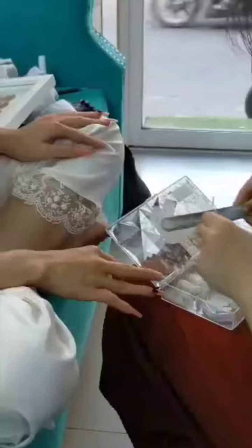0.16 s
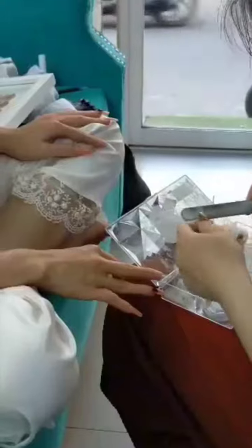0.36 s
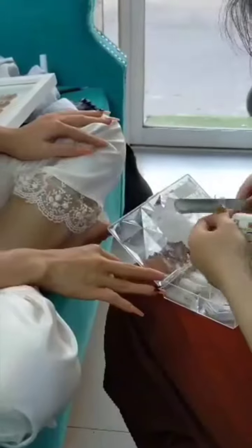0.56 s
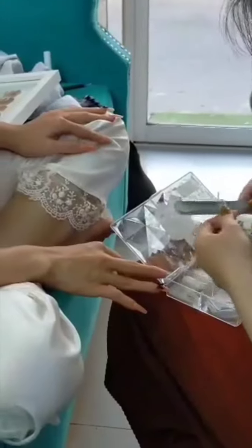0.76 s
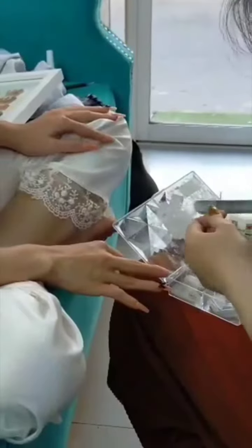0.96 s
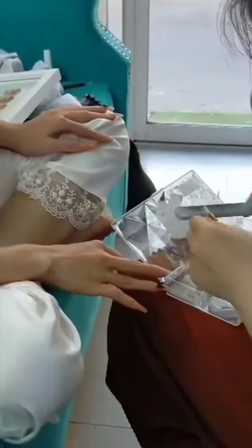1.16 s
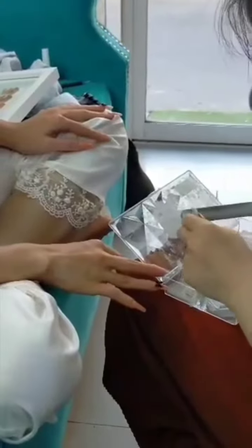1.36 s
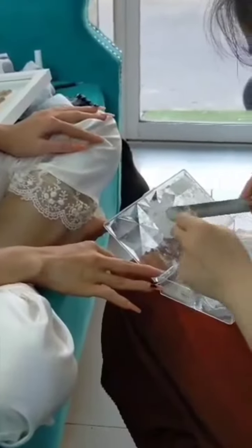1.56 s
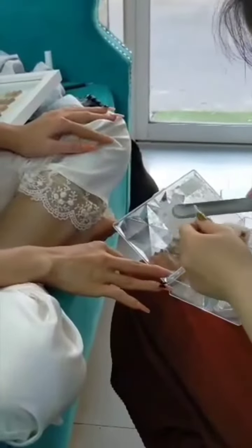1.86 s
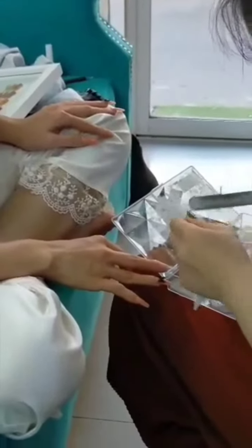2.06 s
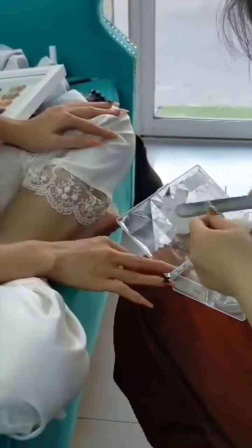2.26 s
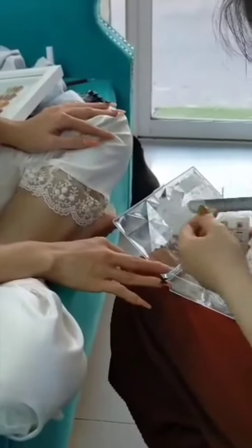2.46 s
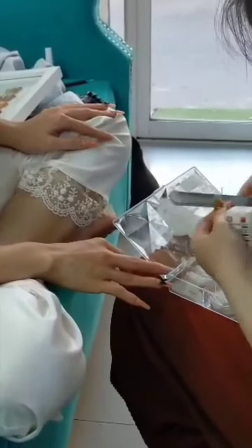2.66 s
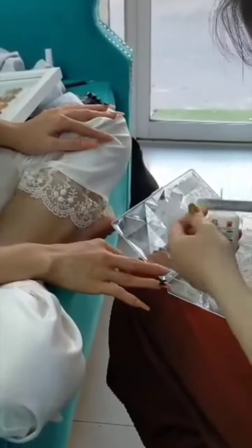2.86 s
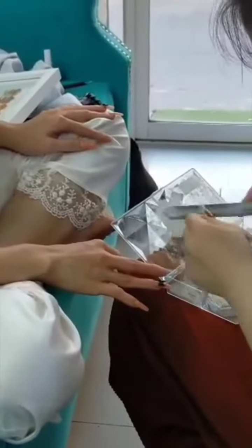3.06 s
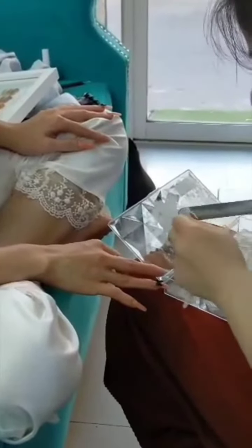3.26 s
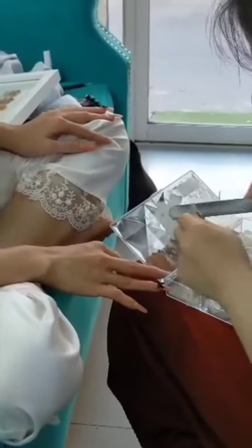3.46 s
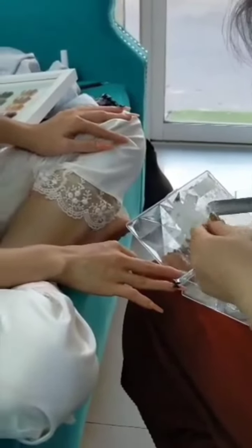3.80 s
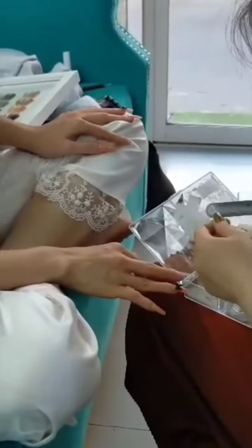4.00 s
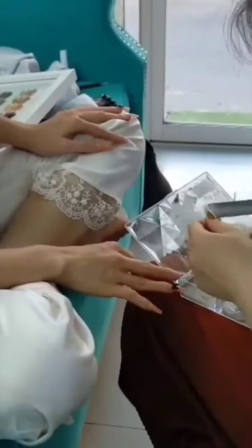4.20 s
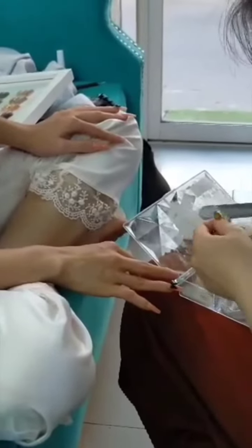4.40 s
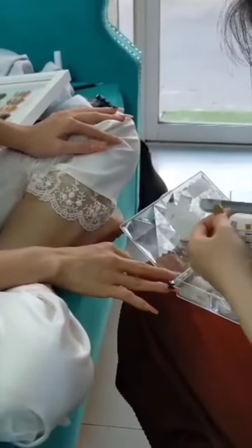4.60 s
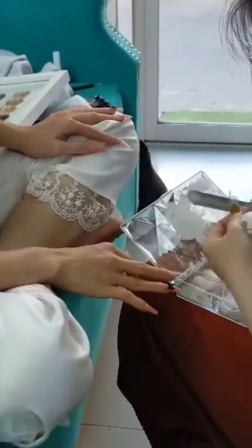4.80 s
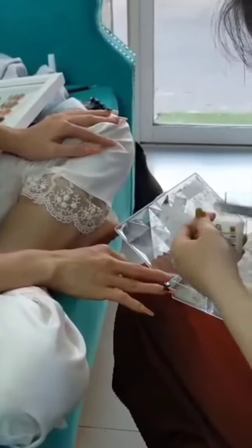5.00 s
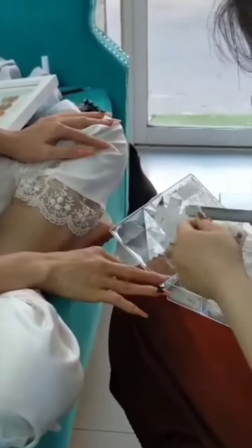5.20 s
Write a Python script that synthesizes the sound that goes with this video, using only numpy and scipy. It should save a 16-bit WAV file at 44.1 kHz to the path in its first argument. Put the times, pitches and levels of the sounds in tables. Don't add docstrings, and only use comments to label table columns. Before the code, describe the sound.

A metal file rasps over a plastic nail tip in short, uneven scratchy strokes, close up in a small shop with faint traffic outside.

```python
import sys
import numpy as np
from scipy import signal
from scipy.fft import rfft, irfft, next_fast_len
from scipy.io import wavfile
from scipy.ndimage import uniform_filter1d, minimum_filter1d, map_coordinates

SR = 44100
rng = np.random.default_rng(int(sys.argv[2]) if len(sys.argv) > 2 else 0)


def unload_wav(signal):
    wavfile.write(
        sys.argv[1],
        SR,
        np.round(np.clip(np.atleast_2d(signal).T, -1, 1) * 32767).astype(np.int16),
    )


def volts_from_db(level):
    exponent = np.asarray(level, float) / 20
    return 10 ** exponent


N = 275625

# start in seconds, length in seconds,
# rasp level half way in dB, its trend from start to end in dB, file body against rasp in dB.
PUSHES = [(.905, 0.1, -29, -5, -23), (1.055, 0.087, -26.5, -5.5, -21.5), (1.2, 0.096, -27, -3, -23),
          (1.615, 0.083, -26.5, -7, -19), (1.885, 0.093, -27.5, -11.5, -14.5),
          (2.315, 0.1, -31, -5.5, -19.5), (2.73, 0.12, -28, -9.5, -23.5), (3.05, .1, -28, -3.5, -26),
          (3.5, 0.097, -30.5, -10, -14), (3.78, 0.082, -29, -14, -13.5), (3.91, 0.085, -38, -10, -15.5),
          (4.044, 0.082, -33.5, -12, -15), (4.743, 0.088, -30.5, -12, -24.5), (4.873, 0.11, -26.5, -3, -25),
          (5.03, 0.098, -25.5, 0, -14), (5.135, 0.052, -41.5, 6, -21), (5.19, .11, -28.5, -2.5, -24),
          (5.635, 0.092, -37, -12.5, -18.5), (5.765, 0.091, -32.5, -0.5, -22)]
PULLS = [(0.599, 0.12, -27.5, 6.5, -23), (0.759, .095, -29.5, 13.5, -28), (1.49, 0.079, -34.5, 11, -21.5),
         (1.742, 0.085, -31.5, -5, -24), (2.184, 0.068, -37.5, -3, -12.5), (2.561, 0.12, -32.5, 8.5, -19.5),
         (2.885, 0.12, -27.5, -1, -13), (3.362, 0.1, -34.5, 1.5, -19.5), (3.629, 0.11, -34, -2.5, -18),
         (4.355, 0.082, -39, -1, -15), (4.483, 0.077, -36, -1.5, -17), (4.705, 0.029, -53.5, 19, -33.5),
         (5.502, 0.088, -29, 1, -21.5), (5.902, .1, -35.5, -8, -20), (6.185, 0.072, -37, 2, -15)]
PUSH = dict(creep_db=-0.5, lift_db=2.5, landing_db=8.5, grows_db=8.5, drone_db=-26, drone_per_body=-0.43)
PULL = dict(creep_db=2.5, lift_db=4.5, landing_db=4.5, grows_db=4.5, drone_db=-24, drone_per_body=0)
REBITE_S, REBITE_DB = 0.007, -6.5
# time in seconds, share of contact on the free edge from 0 to 1.
EDGE_CONTACT = [(.6, 0.4), (.95, 0.62), (1.25, 0.38), (1.53, 0.82), (1.66, 0.17), (1.95, .3), (2.2, 0.88),
                (2.8, 0.79), (2.92, 0.24), (3.1, 0.81), (3.45, 0.84), (3.67, 0.23), (4.1, 0.31),
                (4.4, 0.32), (5.1, 0.09), (5.56, 0.48), (5.8, 0.06), (6.2, 0.46)]
# time in seconds, peak level in dB.
CATCHES = [(0.62, -9.5), (0.6702, -13), (0.8155, -29), (1.0655, -7), (1.0774, -7.5), (1.2132, -7.5),
           (1.5342, -17.5), (1.5506, -19.5), (1.7716, -19), (1.8916, -12), (1.9174, -7), (2.2087, -25.5),
           (2.2394, -14.5), (2.333, -16), (2.351, -23), (2.3998, -15), (2.591, -21), (3.0979, -9.5),
           (3.4204, -18.5), (4.0437, -9), (4.0622, -22.5), (4.515, -23), (4.7557, -8), (4.9038, -11),
           (5.042, -7), (5.0854, -19), (5.0904, -23), (5.2468, -7), (5.7917, -17.5), (5.925, -17.5),
           (.892, -22.5), (1.19, -19), (1.607, -25), (2.309, -25), (2.576, -28), (3.343, -26), (3.51, -22.5),
          (3.796, -16), (4.022, -28.5), (4.033, -15), (4.038, -16.5), (4.478, -25), (4.541, -21),
          (5.023, -33), (5.034, -8), (5.043, -6.5), (5.586, -14), (6.219, -27), (3.504, -13.5),
          (3.781, -15), (.935, -11.5), (1.057, -23), (4.358, -21), (4.878, -13.5), (5.507, -22),
          (5.639, -18.5), (5.767, -24), (5.905, -25.5)]
CATCH_DB = -1.5

# frequency in Hz, level in dB per Hz.
FLAT_TONE = [(2060, -27), (3500, -50), (3940, -24.5), (4380, -27.5), (5150, -9), (6260, -3.5), (6770, -0.5),
             (7230, 1.5), (9350, -23), (11200, -20.5), (13300, -26.5)]
# frequency in Hz, level in dB per Hz.
EDGE_TONE = [(2060, -25.5), (3500, -44), (4020, -9.5), (4350, -20), (4600, -14.5), (5380, -10.5),
             (5980, -52.5), (7000, -9), (7870, -1.5), (8320, 1), (10400, -17), (12400, -24), (13300, -25)]
# frequency in Hz, level in dB per Hz.
BODY_TONE = [(1260, -32), (2150, -13), (2330, -0.5), (2520, -9), (2790, -4.5), (3220, -6.5), (3700, -2.5),
             (4810, -7.5), (8140, -120)]
# frequency in Hz, level in dB per Hz.
FINGER_TONE = [(470, -36), (800, -14), (904, -9), (1570, -9), (1710, -5), (2200, -4.5), (2860, -26),
               (4840, -120)]
# frequency in Hz, level in dB per Hz.
FIZZ_TONE = [(8000, -37), (10000, -3), (13300, -4), (14500, -5)]
FIZZ_DB, FIZZ_PER_DB = -27, -1.1

# time in seconds, peak in dB, pitch in Hz, rebound against peak in dB.
TICKS = [
    (1.8903, -40.5, 860, -14),
    (2.393, -24.5, 1980, -22),
    (3.9936, -26, 1800, -8.5),
]

# time in seconds, level in dB.
TRAFFIC = [(0.62, -48), (1.01, -62), (1.47, -52), (1.56, -60), (2.5, -59), (3.05, -64), (3.28, -60.5),
           (3.71, -63.5), (4.71, -61.5), (4.74, -63), (6.23, -61.5), (6.25, -66)]
# frequency in Hz, level in dB per Hz.
RUMBLE_TONE = [(15, -59.5), (25, -28.5), (43, -15.5), (93, -1), (113, 1), (260, -9.5), (340, -42),
               (570, -120)]
# frequency in Hz, level in dB per Hz.
AIR_TONE = [(120, -16.5), (200, -9.5), (321, -4), (439, -3), (754, -10.5), (1270, -6.5), (1570, -9.5),
            (3000, -18), (5720, -26.5), (6130, -38), (7180, -21.5), (13000, -51.5)]
AIR_DB, AIR_FOLLOWS = -61, 0.42
SETTLE_DB, SETTLE_S = 6.5, 0.57
# start in seconds, end in seconds, pitch in Hz, level in dB.
HORNS = [
    (3.92, 4.1, 443, -69),
    (4.22, 4.5, 443, -66),
    (4.4, 4.62, 350, -68),
    (6.0, 6.25, 523, -68),
    (1.33, 1.55, 212, -67),
]

# frequency in Hz, time to fall by 60 dB in seconds.
SHOP_DECAY = [(1000, 0.32), (4000, 0.21), (8000, 0.21), (13000, 0.17)]
# frequency in Hz, side against middle in dB.
WIDTH = [(4100, -45), (4500, -2), (6000, -2), (8000, -2), (10500, -6), (13000, -10)]
WIDTH_DB = 0.4
START = 0.597
TOP_HZ = 13100


def rasp():
    touch, level_db, body_db, drone_db, bites = hand()
    rubbing = grit(chatter_hz=190, scatter_db=3, size_db=2.2, burst_s=0.0008, share=0.6)
    force = touch * volts_from_db(level_db - 1.09) * rubbing

    bites += [(s, db + CATCH_DB) for s, db in CATCHES]
    fade = volts_from_db(-60 * np.arange(400) / SR / 0.0051)
    for s, db in bites:
        bite = fade * rng.standard_normal(400)
        force[round(s * SR):][:400] += volts_from_db(db) * bite / np.abs(bite).max()

    edge, = curves(EDGE_CONTACT)
    edge = np.clip(edge, 0, 1)
    nail = coloured(force * np.sqrt(1 - edge), FLAT_TONE)
    nail += coloured(force * np.sqrt(edge), EDGE_TONE)
    fizz_db = FIZZ_DB + FIZZ_PER_DB * np.clip(level_db + 32.5, -9, 9)
    nail += coloured(force * volts_from_db(fizz_db), FIZZ_TONE)
    nail = above(nail * volts_from_db(-2.5), edge_hz=3600, slope_hz=45)

    body = above(coloured(force * volts_from_db(body_db), BODY_TONE), edge_hz=2253, slope_hz=86)
    drone = coloured(force * volts_from_db(drone_db - 4), FINGER_TONE)
    drone -= above(drone, edge_hz=2270)
    return nail + body + drone


def hand():
    t, touch, bites = np.arange(N) / SR, np.zeros(N), []
    level_db, body_db, drone_db = np.full((3, N), -60.0)
    for strokes, way in ((PUSHES, PUSH), (PULLS, PULL)):
        for s, length, db, trend_db, load_db in strokes:
            span = slice(round((s - 0.003) * SR), round((s + length + 0.01) * SR))
            since = np.clip(t[span] - s, 0, 1)
            half = np.clip(since / length, 0, 1) - 0.5

            lands = (since > 0) * (1 - 0.7 * np.exp(-since / 0.012))
            lifts = np.clip((length + 0.004 - since) / 0.008, 0, 1)
            touch[span] += lands * lifts

            sag_db = np.where(half < 0, way["creep_db"], way["lift_db"])
            level_db[span] = db + trend_db * half - sag_db * (2 * half) ** 2
            body_db[span] = load_db + way["grows_db"] * half
            drone_db[span] = way["drone_db"] + way["drone_per_body"] * (load_db + 19)

            first_db = db - trend_db / 2 + way["landing_db"]
            bites.append((s + 0.0022, first_db))
            bites.append((s + 0.002 + REBITE_S, first_db + REBITE_DB))
    return uniform_filter1d(touch, size=90), level_db, body_db, drone_db, bites


def grit(chatter_hz, scatter_db, size_db, burst_s, share):
    phase = np.cumsum(chatter_hz * volts_from_db(scatter_db * wobble(60))) / SR
    slips = np.diff(np.floor(phase), prepend=0) * volts_from_db(size_db * wobble(300))
    bursts = signal.lfilter([1], [1, -np.exp(-1 / (burst_s * SR))], slips)
    bursts = unit(bursts * rng.standard_normal(N))
    hiss = unit(volts_from_db(0.47 * wobble(120)) * rng.standard_normal(N))
    return np.sqrt(1 - share) * hiss + np.sqrt(share) * bursts


def ticks():
    def cycle(turns):
        return -np.cos(2 * np.pi * turns) * np.exp(-(turns / 0.62) ** 2)

    out, t = np.zeros(N), np.arange(-200, 400) / SR
    for s, db, hz, rebound_db in TICKS:
        tick = cycle(hz * t) + volts_from_db(rebound_db) * cycle(850 * (t - 0.0016))
        out[round(s * SR) - 200:][:len(t)] += volts_from_db(db) * tick
    return out


def echo(x, t60s, delay_s, length):
    out = np.zeros((2, N + 2 * length))
    cuts = [round(stroke[0] * SR) - 200 for stroke in sorted(PUSHES + PULLS)] + [N]
    for a, b in zip(cuts, cuts[1:]):
        hz, t, z = signal.stft(rng.standard_normal((2, length)), SR, nperseg=128)
        fade = volts_from_db(-60 * t / along(t60s, hz)[:, None])
        tail = signal.istft(z * fade, SR, nperseg=128)[1][:, :length]
        tail /= np.linalg.norm(tail, axis=1, keepdims=True)
        wet = signal.fftconvolve(x[None, a:b], tail, axes=1)
        out[:, a + round(delay_s * SR):][:, :wet.shape[1]] += wet
    return out[:, :N]


def street():
    t = np.arange(N) / SR
    rumble_db, = curves(TRAFFIC)
    settle_db = SETTLE_DB * np.exp(-np.clip(t - START, 0, None) / SETTLE_S)
    air_db = AIR_DB + AIR_FOLLOWS * (rumble_db - np.median(rumble_db)) + settle_db

    rumble = above(hush(RUMBLE_TONE, patchy_db=2), edge_hz=68, slope_hz=5.9)
    out = volts_from_db(rumble_db - 1.5 + 1.6 * wobble(8.3)) * rumble
    out += volts_from_db(air_db + 1.5 + wobble(10)) * hush(AIR_TONE, patchy_db=2)
    for start, end, hz, db in HORNS:
        swell = np.clip(np.minimum(t - start, end - t) / 0.05, 0, 1)
        swell = swell * volts_from_db(db + 3.5 + 2 * wobble(9))
        turn = 2 * np.pi * hz * t + 0.4 * wobble(14)
        out += swell * (np.sin(turn) + volts_from_db(-23) * np.sin(2 * turn))
    return out


def hush(spectrum, patchy_db):
    return unit(coloured(patched(rng.standard_normal(N), patchy_db, 4, 8), spectrum))


def patched(x, patchy_db, bins, frames):
    z = signal.stft(x, nperseg=512)[2]
    field = uniform_filter1d(rng.standard_normal(z.shape), bins, 0)
    field = uniform_filter1d(field, frames, 1)
    return signal.istft(z * volts_from_db(patchy_db * unit(field)), nperseg=512)[1][:N]


def unit(x):
    return x / np.sqrt(np.mean(x ** 2) + 1e-20)


def along(points, hz):
    f, v = np.transpose(points)
    return np.interp(np.log(hz + 1), np.log(f + 1), v)


def curves(rows):
    s, *cols = np.transpose(rows)
    return [np.interp(np.arange(N) / SR, s, c) for c in cols]


def wobble(rate):
    knots = rng.standard_normal(int(N * rate / SR) + 4)
    return map_coordinates(knots, [np.arange(N) * rate / SR])


def filtered(x, response):
    m = next_fast_len(N + SR // 2)
    return irfft(rfft(x, m) * response(np.fft.rfftfreq(m, 1 / SR)), m)[..., :N]


def coloured(x, spectrum):
    def gain(hz):
        return volts_from_db(along(spectrum, hz))

    power = np.mean(gain(np.linspace(0, SR / 2, 4096)) ** 2)
    return filtered(x, gain) / np.sqrt(power)


def above(x, edge_hz, slope_hz=60):
    return filtered(x, lambda hz: 1 / (1 + np.exp(np.clip((edge_hz - hz) / slope_hz, -50, 50))))


def scene():
    near = rasp()
    table = echo(near, [(1000, 0.011)], delay_s=0.0003, length=SR // 40)
    shop = echo(near, SHOP_DECAY, delay_s=0.004, length=SR // 3)
    mid = near + volts_from_db(-0.5) * table[0] + volts_from_db(-4.5) * shop[0] + ticks() + street()
    side = filtered(table[1] + volts_from_db(-7) * shop[1], lambda hz: volts_from_db(along(WIDTH, hz) + WIDTH_DB))
    return np.array([mid + side, mid - side])


def thinned(pair, mask_db, hole_db):
    both = np.array([pair[0] + pair[1], pair[0] - pair[1]]) / 2
    hz, _, (mid, side) = signal.stft(both, SR, nperseg=1024)
    hz = hz[:, None]
    power = uniform_filter1d(uniform_filter1d(np.abs(mid) ** 2, 7, 1), 3, 0) + 1e-14

    band = uniform_filter1d(power, 36, 0)
    no_attack = band < 3 * np.roll(band, 3, axis=1)
    no_tail = band > 0.1 * -minimum_filter1d(-band, 25, 1)
    in_steady, elsewhere = tiles(side.shape, 36, 5, 0.47), tiles(side.shape, 36, 7, 0.28)
    side = side * np.where(no_attack & no_tail, in_steady, elsewhere)

    upper = np.roll(uniform_filter1d(power, 6, 0), -6, axis=0)
    masked = (upper > power * volts_from_db(2 * mask_db)) & (np.abs(hz - 2800) < 1100)
    thin_top = tiles(mid.shape, 4, 9, 0.16) & (hz > 11200)
    mid = mid * np.where(masked | thin_top, volts_from_db(hole_db), 1)
    mid, side = signal.istft(np.array([mid, side]), SR, nperseg=1024)[1][:, :N]
    return np.array([mid + side, mid - side])


def tiles(shape, band_bins, frames, share):
    bands = rng.standard_normal((shape[0] // band_bins + 1, shape[1]))
    field = unit(uniform_filter1d(uniform_filter1d(bands, frames, 1), 3, 0))
    chosen = field > np.quantile(field, 1 - share)
    return np.repeat(chosen, band_bins, axis=0)[:shape[0]]


def top_cut(x):
    return signal.sosfilt(signal.butter(12, 14370, fs=SR, output="sos"), x)


def record(dry):
    on = np.clip((np.arange(N) / SR - START) / 0.003, 0, 1)
    top = above(dry, TOP_HZ, slope_hz=25)
    power = np.mean(top ** 2, axis=0)
    attack = uniform_filter1d(power, 200) / (np.abs(uniform_filter1d(power, 1500)) + 1e-11)
    gate = uniform_filter1d(np.clip(attack - 2.6, 0, 1), 300)
    limited = dry - top * (1 - volts_from_db(-6) * gate)
    return top_cut(thinned(limited, mask_db=7.5, hole_db=-16) * on)


dry = scene()
out = record(dry)
unload_wav(out)
```